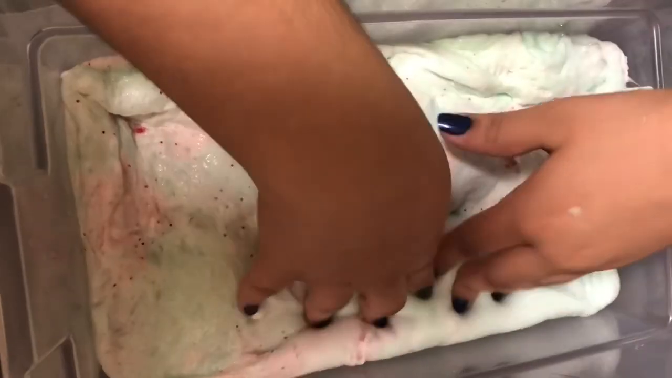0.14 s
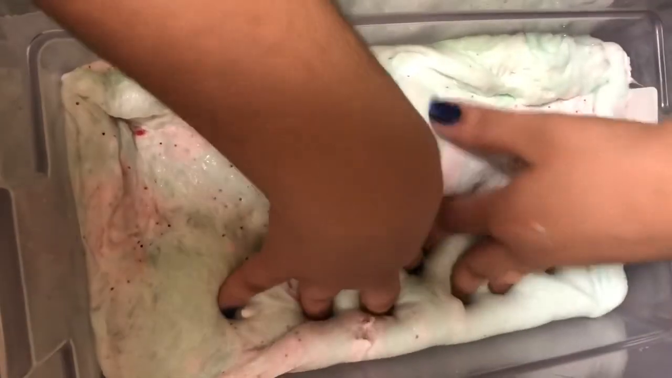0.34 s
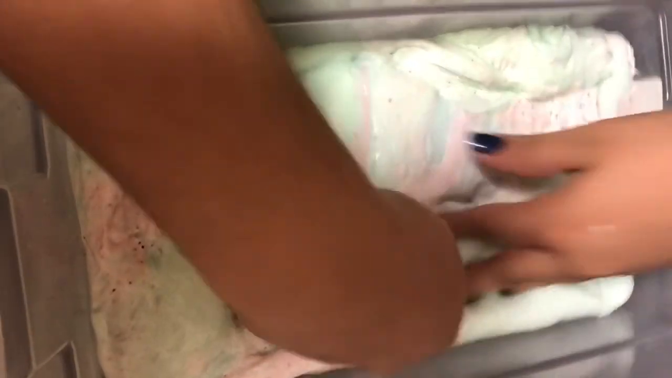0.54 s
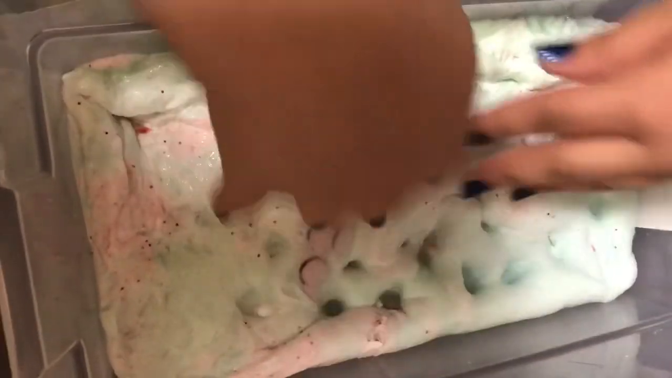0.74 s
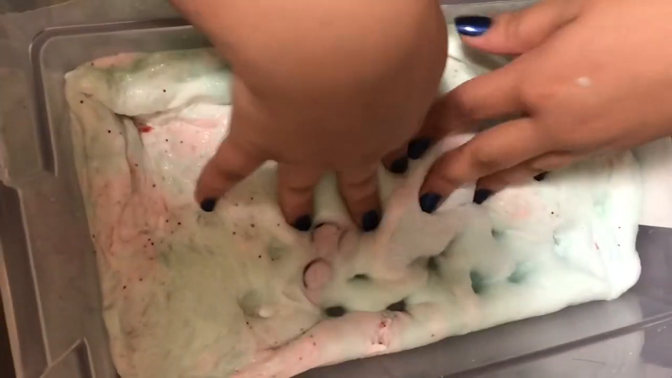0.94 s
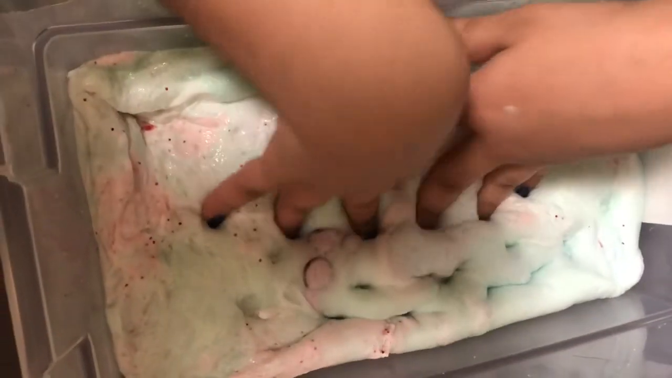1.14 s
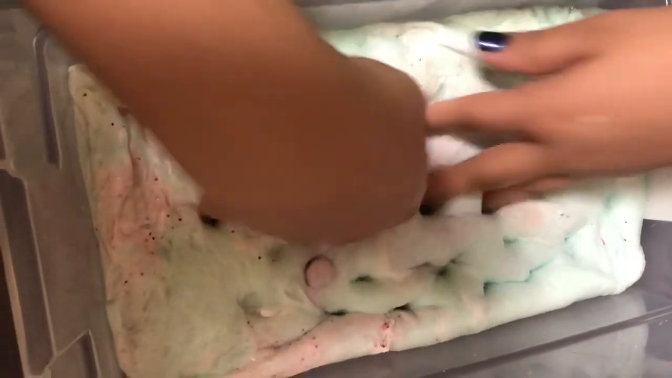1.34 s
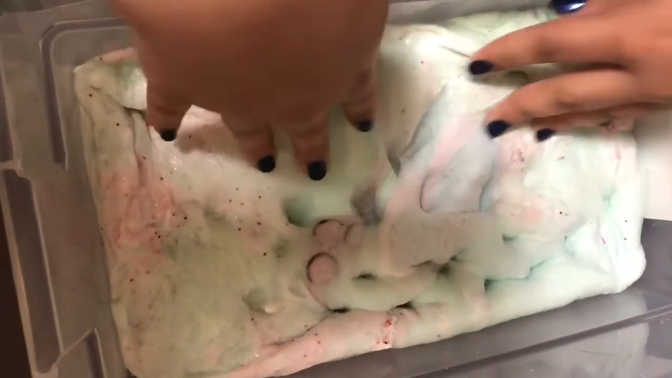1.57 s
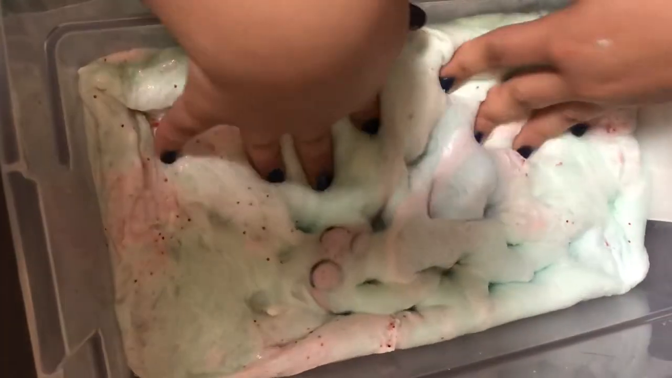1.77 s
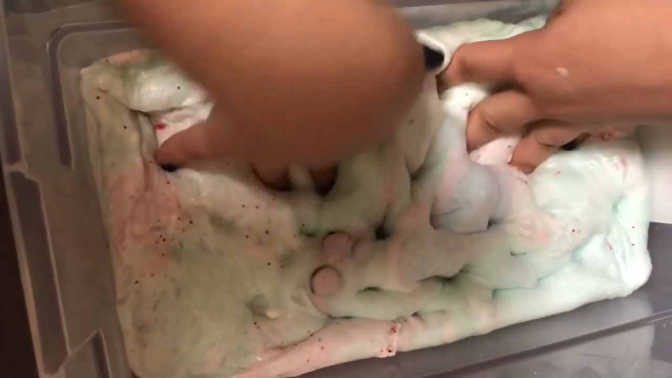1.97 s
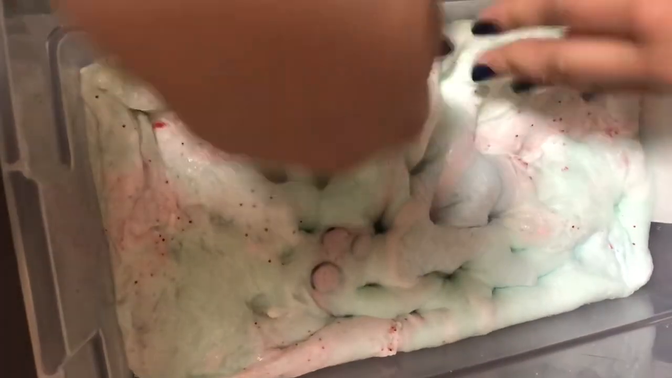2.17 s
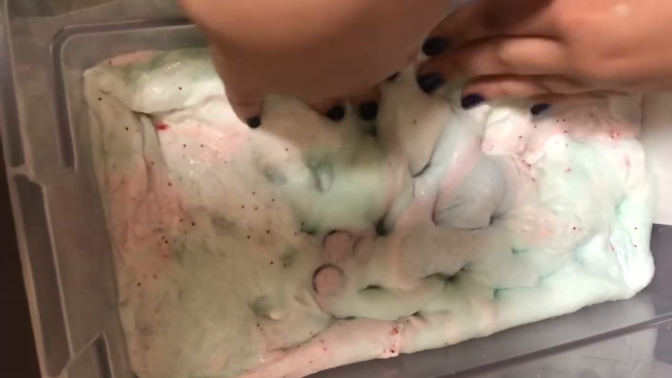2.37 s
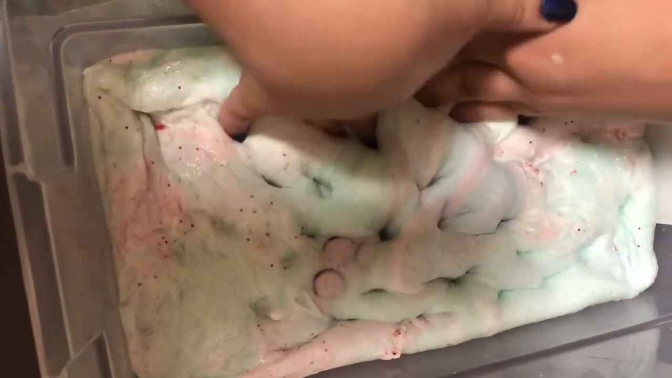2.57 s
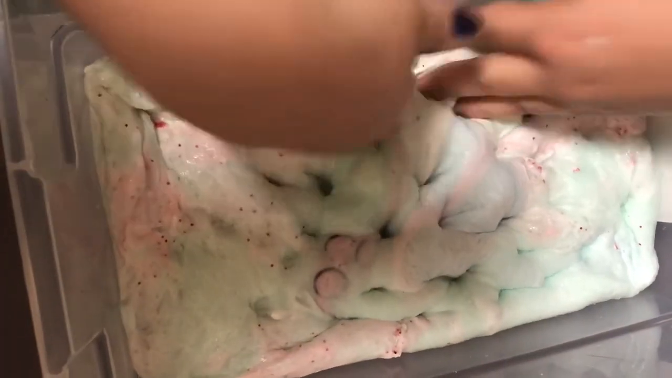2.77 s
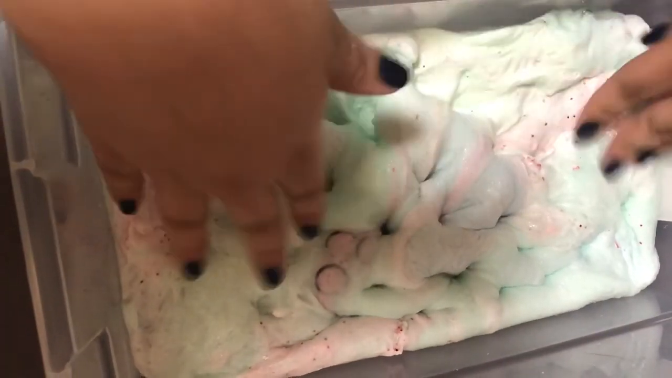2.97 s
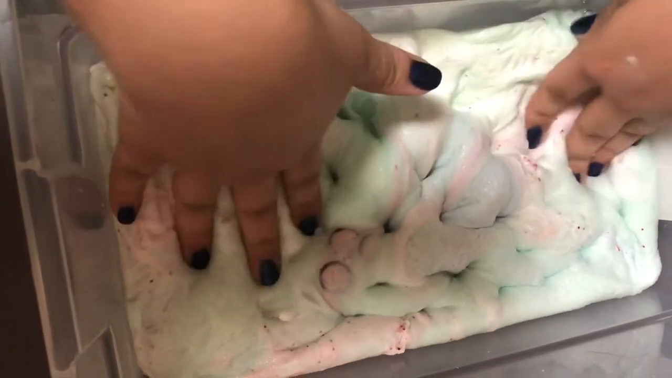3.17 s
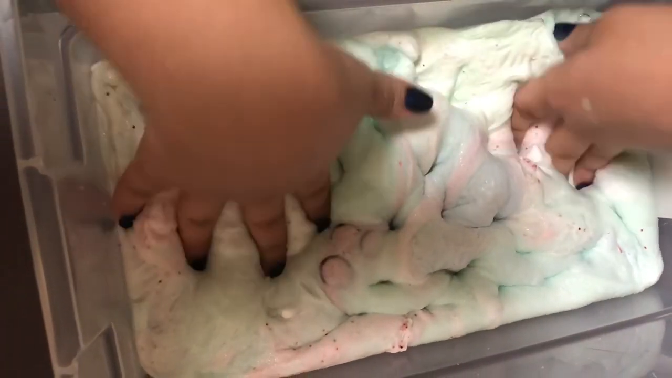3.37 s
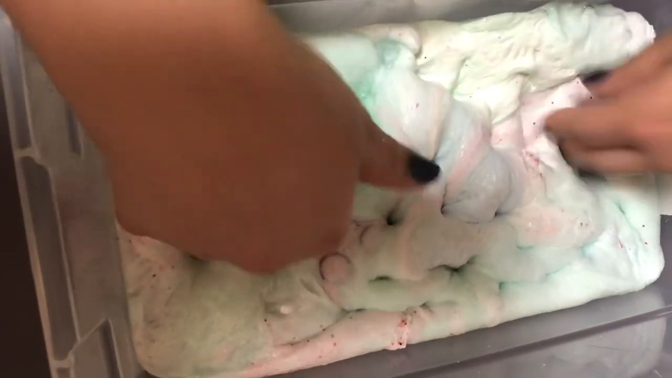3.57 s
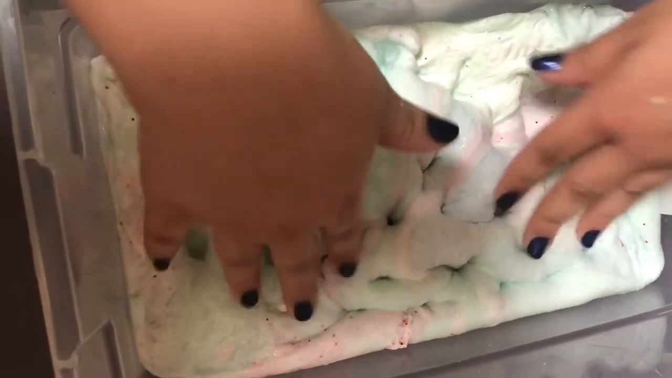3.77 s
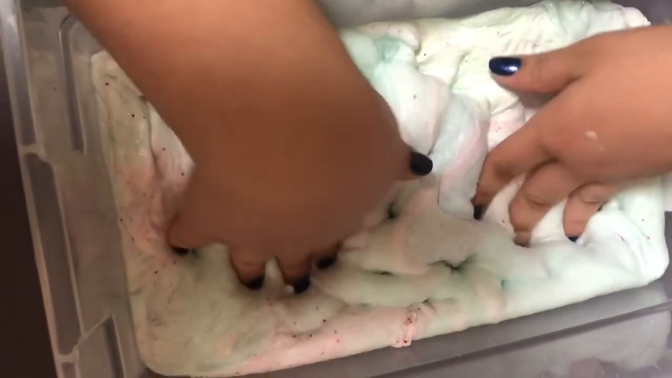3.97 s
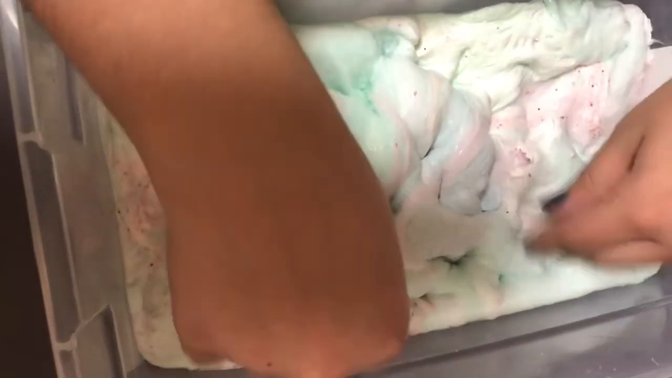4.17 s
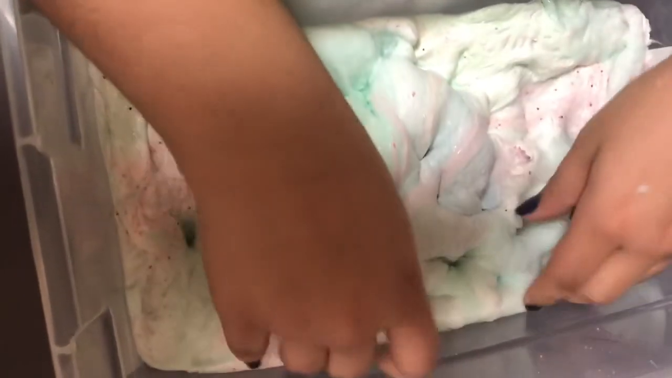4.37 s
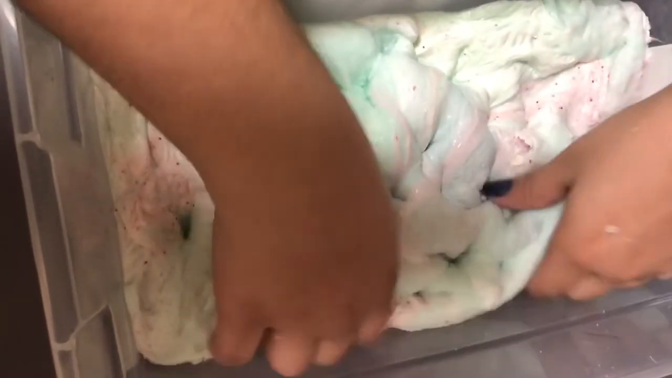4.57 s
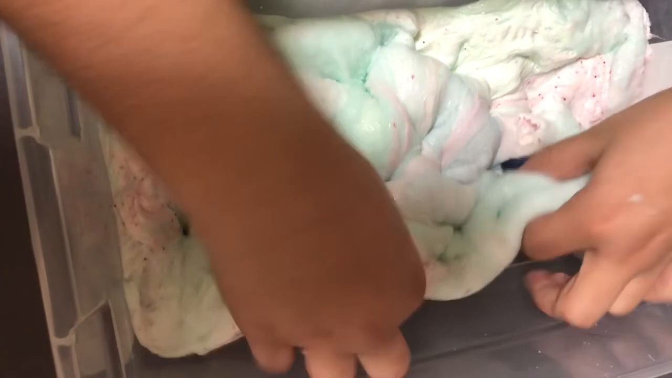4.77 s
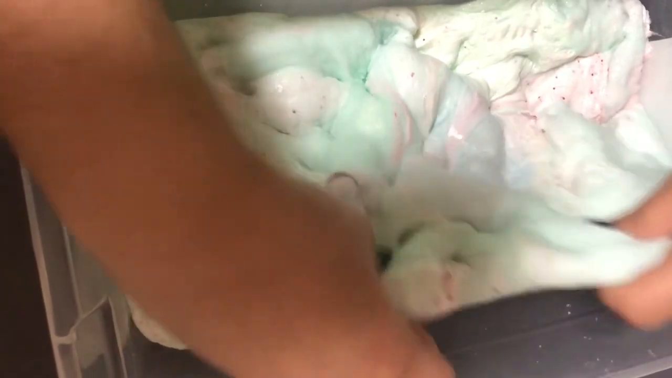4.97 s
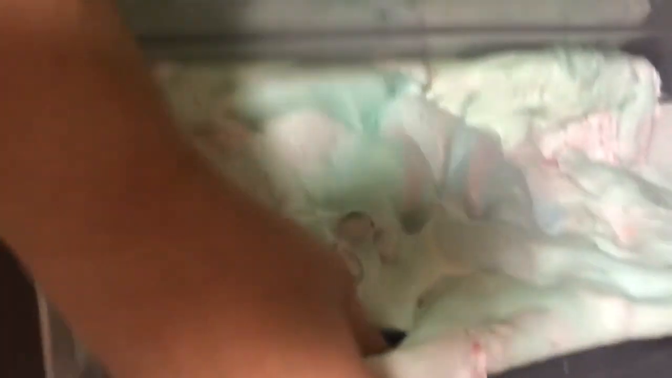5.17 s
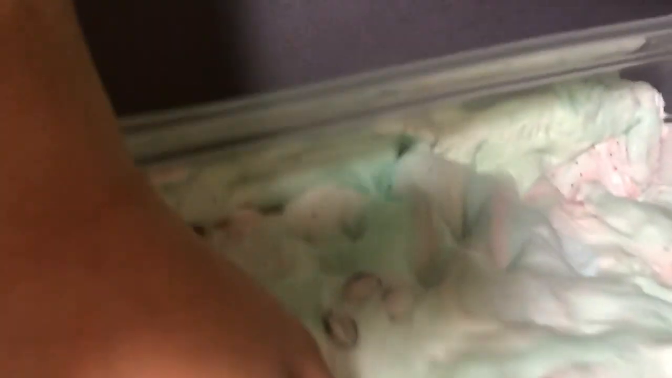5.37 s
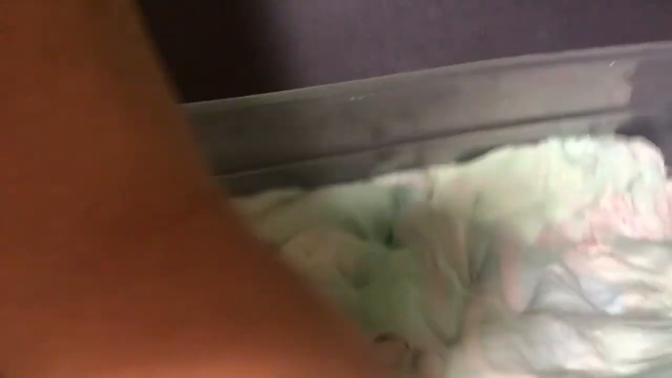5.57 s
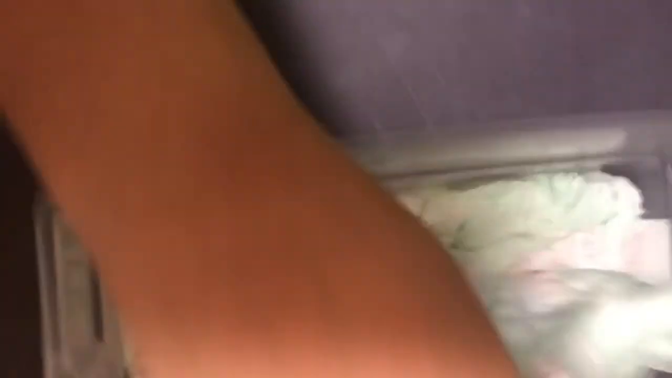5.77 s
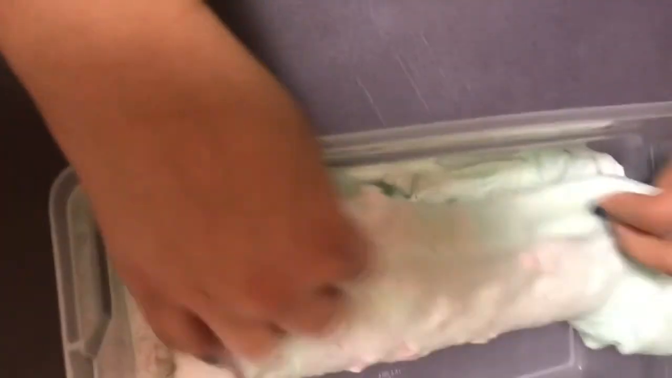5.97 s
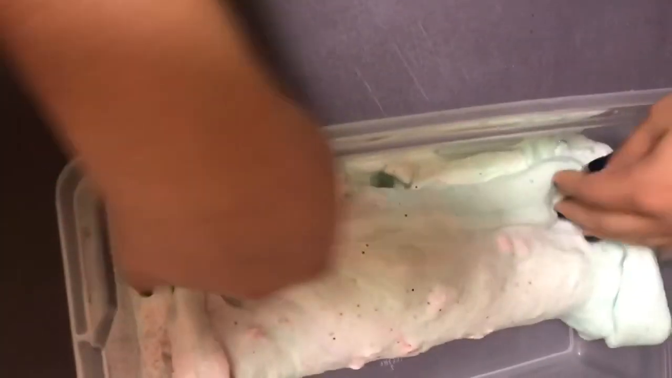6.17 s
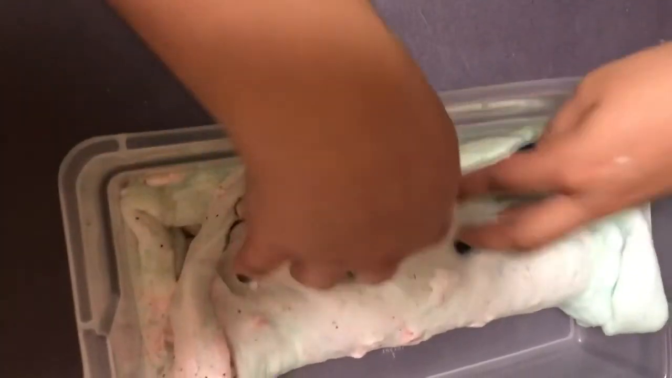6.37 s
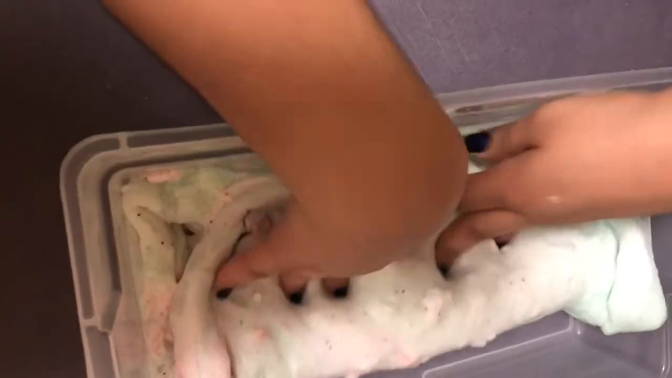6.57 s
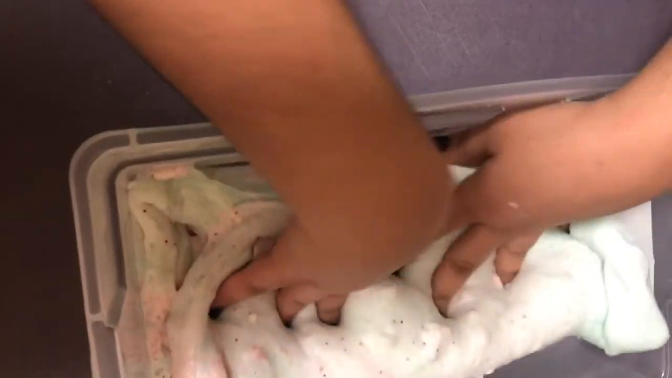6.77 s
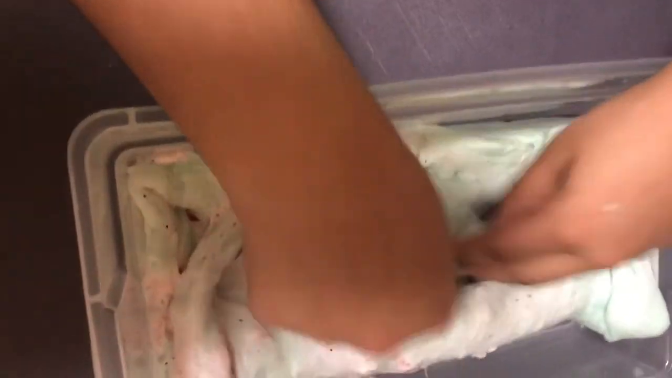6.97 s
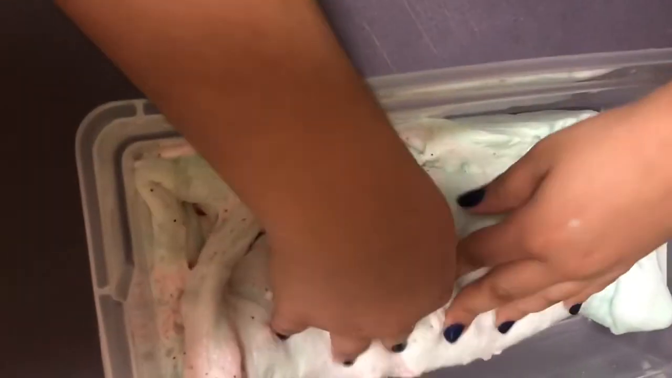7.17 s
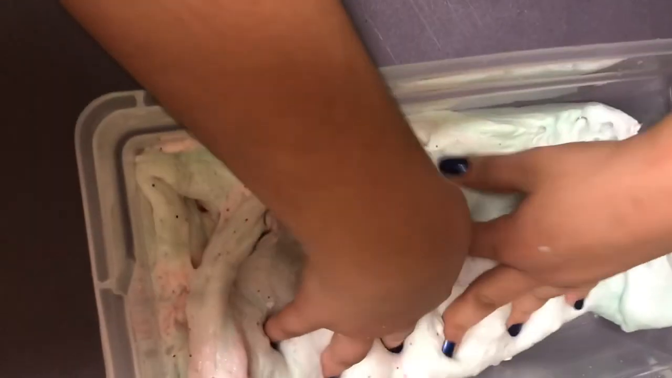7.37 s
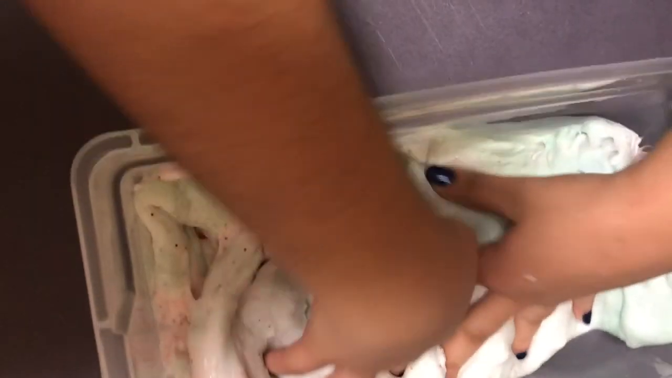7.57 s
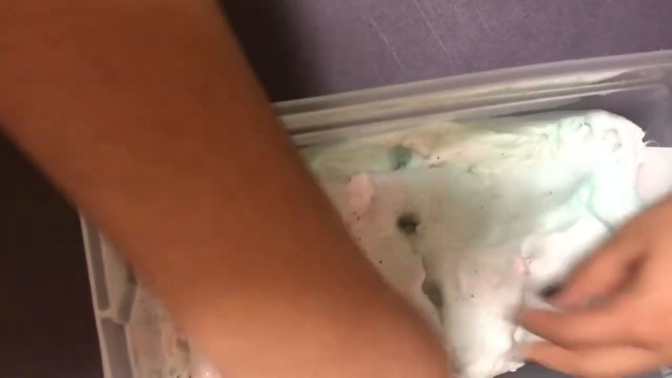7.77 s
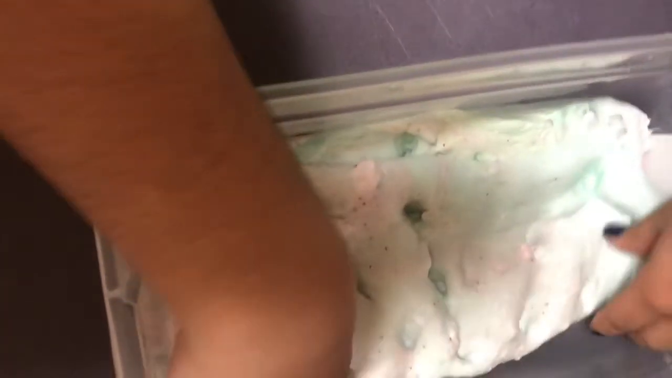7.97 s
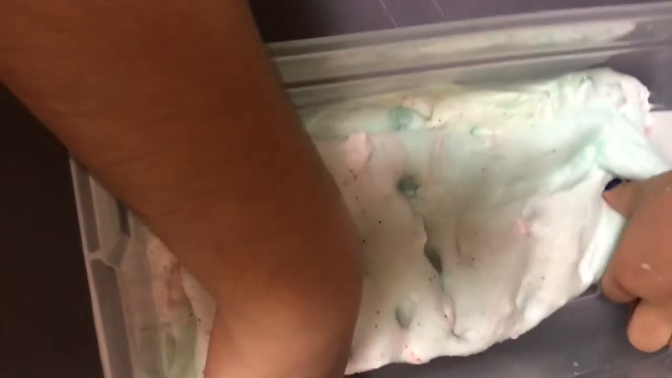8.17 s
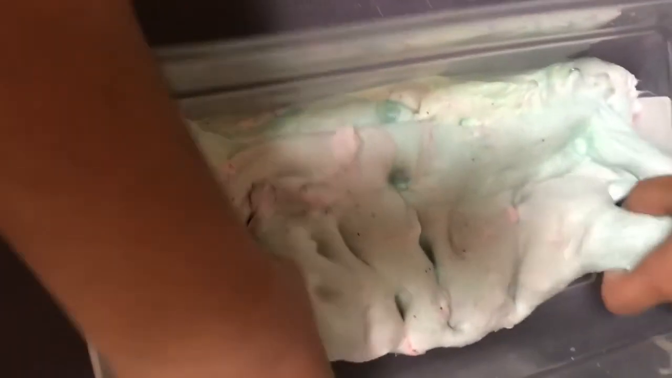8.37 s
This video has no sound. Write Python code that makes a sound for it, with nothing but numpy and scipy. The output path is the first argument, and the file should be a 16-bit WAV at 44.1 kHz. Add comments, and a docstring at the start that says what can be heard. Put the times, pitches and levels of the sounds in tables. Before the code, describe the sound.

Hands knead foamy slime in a plastic bin, fizzing, snapping and gulping close up, with one hard bin knock over quiet fan hum.

```python
"""Over a steady fan hum in a quiet room, hands knead foamy slime in a plastic bin close to a microphone.
From the start shaped noise fizzes as foam is squeezed and peeled, and drags along walls through a moving resonance;
air pockets snap as noise bursts and gulp as sinking sines, in clusters near 0.8, 4.5 and 8.2 s.
Presses thump the modes of the bin; near 6 s the tilted bin drops back onto the floor and rocks,
and the kneading goes on to the last snaps and thump."""
import sys
import numpy as np
from scipy import signal
from scipy.io import wavfile

SR = 44100
rng = np.random.default_rng(int(sys.argv[2]) if len(sys.argv) > 2 else 0)


def store_pcm(level_fs):
    """Save levels as 16-bit WAV."""
    pcm = np.round(np.clip(level_fs, -1, 1) * 32767).astype(np.int16)
    wavfile.write(sys.argv[1], SR, np.atleast_2d(pcm).T)


def gain_from_db(level_db):
    """Convert decibel levels to linear amplitude factors (20 dB per decade)."""
    decades = np.asarray(level_db, float) / 20
    return 10 ** decades


N = 372204

# spectrum of bursting foam, for fine fizz and for snaps: (frequency [Hz], relative level [dB])
FOAM_SPECTRUM = [(400, -39), (2500, 2.5), (4500, 5), (9000, 2.5), (15000, 0)]


def evened(x):
    """Normalization: scales a signal to rms 1."""
    return x / np.sqrt(np.mean(x ** 2) + 1e-20)


def colour(x, points):
    """Minimum-phase filtering: the log gain of a (Hz, dB) table fixes the phase of a causal response."""
    hz, db = np.transpose(points)
    bins = abs(np.fft.fftfreq(4096, 1 / SR)) + 1
    log_gain = np.log(gain_from_db(np.interp(np.log(bins), np.log(hz), db)))
    response = np.exp(np.conj(signal.hilbert(log_gain)))
    taps = np.fft.ifft(response).real[:2048]
    return signal.oaconvolve(x, taps)[:len(x)]


def add(mix, s, sound):
    """Superposition: adds a sound to the mix from time s [s]."""
    part = mix[round(s * SR):][:len(sound)]
    part += sound[:len(part)]


def ring(hz, t60):
    """Damped oscillation: a sine that falls by 60 dB in t60 [s]."""
    t = np.arange(int(t60 * SR)) / SR
    return gain_from_db(-60 * t / t60) * np.sin(2 * np.pi * hz * t)


def grains(per_s, spread_db, length_s):
    """Shot noise: random moments start noise bursts of uneven size that decay exponentially."""
    starts = rng.random(N) < per_s / SR
    size = gain_from_db(spread_db * np.minimum(rng.exponential(1, N), 4)) * starts
    decay = np.exp(-np.arange(400) / SR / length_s)
    return rng.standard_normal(N) * signal.oaconvolve(size, decay)[:N]


def hum():
    """Broadband fan noise and narrow-band tones: noise through a damped resonator wavers within its bandwidth."""
    # spectrum of the air noise: (frequency [Hz], relative level per Hz [dB])
    air_spectrum = [(21, -27.5), (55, -9.5), (90, -14), (154, -15), (193, -6), (384, -9), (536, -19),
                    (915, -19), (1210, -24), (1500, -22.5), (1900, -31), (15500, -65.5)]
    # narrow fan tones: (frequency [Hz], bandwidth [Hz], rms level [dB])
    fan_tones = [(165.2, 7, -55.5), (1562.5, 10, -67.5)]
    out = gain_from_db(-50.5) * evened(colour(rng.standard_normal(N), air_spectrum))
    for hz, width, db in fan_tones:
        resonator = ring(hz, 2.2 / width)  # the bandwidth fixes the decay time
        tone = signal.oaconvolve(rng.standard_normal(N), resonator)[:N]
        out += gain_from_db(db) * evened(tone)
    return out


def room(x):
    """Diffuse reverberation: dense reflections after 4 ms, each band decaying at its own rate."""
    # reverberation time of the room: (frequency [Hz], t60 [s])
    decay_times = [(100, 0.26), (500, 0.35), (1000, 0.43), (3000, 0.38), (14000, 0.23)]
    reflections = rng.standard_normal(SR) * (np.arange(SR) > 0.004 * SR)
    hz, t, z = signal.stft(reflections, SR, nperseg=256)
    table_hz, table_t60 = np.transpose(decay_times)
    t60 = np.interp(hz, table_hz, table_t60)[:, None]
    tail = signal.istft(z * gain_from_db(-60 * t / t60), SR, nperseg=256)[1]
    return signal.oaconvolve(x, tail / np.linalg.norm(tail))[:N]


def bin_body():
    """Modal radiation: a blow starts a dispersed crack and the damped modes of the plastic bin."""
    # modes of the bin: (frequency [Hz], relative level [dB], t60 [s])
    modes = [(76, -8, 0.052), (109, -13.5, 0.29), (165, -6.5, 0.038), (244, -10, 0.036), (348, 2.5, 0.027),
             (529, -2, 0.042), (978, 9, 0.0092), (1900, 7, 0.0034), (2680, -5.5, .012)]
    # dense high modes of the plastic: (frequency [Hz], relative level [dB])
    crack_spectrum = [(300, -45.5), (2000, 0), (4500, 0), (9000, 2), (15000, 4)]
    body, t = np.zeros(SR), np.arange(91) / SR
    # bending waves carry the treble fastest: the crack is a quick downward sweep
    sweep = signal.chirp(t[:90], 17000, t[90], 600) * signal.windows.tukey(90, 0.3)
    add(body, 0, gain_from_db(6.0) * colour(sweep, crack_spectrum))
    for k, (hz, db, t60) in enumerate(modes):
        sign = (-1) ** k  # neighbouring modes swing in opposite sense
        add(body, 0, sign * gain_from_db(db) * ring(hz, t60))
    # a small box radiates no deep bass
    return signal.sosfilt(signal.butter(2, 55, "high", fs=SR, output="sos"), body)


def bin_blows():
    """Impact excitation: a push and short rattle drive the bin; only short contacts reach its high modes."""
    # presses on the bin, and its drop and rocking near 6 s: (time [s], relative strength [dB], contact time [s])
    blows = [(0.027, -18.5, 0.0047), (0.815, -13, 0.0094), (1.317, -34, 0.0049), (2.54, -29, 0.0015),
             (3.069, -23, 0.012), (3.601, -32.5, 0.0027), (4.971, -22, 0.0025), (6.0359, -6, 0.000072),
             (6.0501, -6, 0.0014), (6.0573, -9.5, 0.0013), (6.062, -8.5, 0.0012), (6.082, -14, 0.0019),
             (6.291, -25.5, 0.0041), (8.42, -17, 0.0057)]
    push, t = np.zeros(N), np.arange(3000) / SR
    for s, db, contact in blows:
        noise = rng.standard_normal(len(t))
        rattle = (t == 0) + 0.014 * noise * np.exp(-t / 0.0022)
        window = signal.windows.hann(int(contact * SR) + 3)
        add(push, s, gain_from_db(db) * np.convolve(rattle, window / window.sum()))
    return gain_from_db(-3.0) * signal.oaconvolve(push, bin_body())[:N]


def drag():
    """Moving resonance: frictional noise of the wet mass excites a fold that widens, so its pitch sinks."""
    # wet drag and splash: (frequency [Hz], relative level [dB])
    rub_spectrum = [(150, -6.5), (500, -8), (1200, -10), (2800, -13), (8000, -25.5)]
    # strokes along fingers and walls: (middle time [s], level before the fold [dB], length [s],
    # mid-stroke frequency of the hollow fold [Hz])
    strokes = [(0.0, -37.5, 0.09, 790), (0.763, -50.5, 0.11, 790), (2.224, -62.5, 0.45, 1410),
               (3.517, -49, 0.038, 1300), (3.614, -45.5, 0.095, 740), (4.14, -58, 0.22, 1500),
               (4.903, -55, 0.55, 1320), (5.444, -56.5, 0.64, 1570), (5.834, -50.5, 0.28, 1180),
               (6.993, -53, 0.21, 1180), (7.624, -46, 0.16, 654), (7.763, -50, 0.14, 1300),
               (7.87, -50.5, 0.094, 1000)]
    sink_octaves, lean = 0.95, 0.87  # lean below 1: quick start, slow end
    fold_width, fold_db = 0.4, 7  # bandwidth as a share of the mid-stroke frequency; gain [dB]
    out, t = np.zeros(N), np.arange(N) / SR
    rub = evened(colour(grains(per_s=2000, spread_db=2.5, length_s=0.003), rub_spectrum))
    for s, db, length, hz in strokes:
        on = abs(t - s) < length / 2
        u = (t[on] - s) / length + 0.5  # progress of the stroke, 0 to 1
        stroke = gain_from_db(db) * np.sin(np.pi * u ** lean) * rub[on]
        # shift the fold frequency to zero, low-pass there, and shift back
        fold_hz = hz * 2 ** (sink_octaves * (0.5 - u))
        turn = np.exp(2j * np.pi * np.cumsum(fold_hz) / SR)
        r = np.exp(-np.pi * fold_width * hz / SR)
        smoothed = signal.lfilter([1 - r], [1, -r], stroke / turn)
        fold = 2 * (turn * smoothed).real
        out[on] += stroke + gain_from_db(fold_db) * fold
    return out


def foam(t):
    """Amplitude envelope: each squeeze builds up and ebbs; the pull swells quickly, then all decays to rest."""
    # one row per swell of fizz; a long lift takes several rows: (time when squeezed fullest [s],
    # fizz level [dB], build-up [dB/s], delay until the fingers are free [s], fizz level of the pull [dB])
    swells = [(0.0, -60, 57, 0.01, -57), (0.545, -54.5, 49, 0.22, -48.5), (1.301, -54.5, 72, 0.26, -48),
              (2.05, -54, 70, 0.23, -50), (2.715, -56, 68, 0.31, -51.5), (3.4, -55.5, 78, 0.36, -48.5),
              (4.05, -56.5, 254, 0.28, -50), (4.63, -54, 64, 0.352, -46.5), (5.1, -52.5, 29, 0.16, -49.5),
              (5.45, -53.5, 26, .44, -58.5), (6.02, -62, 38, 0.43, -58), (6.799, -52, 97, 0.35, -47),
              (7.598, -52.5, 62, 0.32, -49.5), (8.2, -58.5, 148, 0.15, -49)]
    ebb, pull_rise, stop = 26.5, 169, 282  # foam tires, swells as fingers peel off, rests [dB/s]
    peel_s = 0.0047  # the pull is at full level this long before the fingers are free
    level = 0
    for full, full_db, build_db, until_free, pull_db in swells:
        free = full + until_free
        rest = gain_from_db(-stop * np.maximum(t - free, 0))
        squeeze = gain_from_db(full_db - build_db * np.maximum(full - t, 0) - ebb * np.maximum(t - full, 0))
        pull = gain_from_db(pull_db - pull_rise * np.maximum(free - peel_s - t, 0))
        level = np.maximum(level, rest * np.maximum(squeeze, pull))
    return level


def fizz():
    """Granular noise: many tiny bubbles burst under the fingers as the foam is squeezed and pulled."""
    bursts = grains(per_s=1000, spread_db=2.8, length_s=0.0012)
    return foam(np.arange(N) / SR) * evened(colour(bursts, FOAM_SPECTRUM))


def pops():
    """Transient and cavity sound: the skin tears with a bright snap; the pocket gulps, sinks in pitch, splashes."""
    # air pockets that burst and gulp: (time [s], relative snap level [dB], gulp level [dB],
    # mid-gulp frequency [Hz])
    pockets = [(0.0054, -33.5, -34, 590), (0.0235, -32, -29.5, 366), (0.546, -27.5, -38, 700),
               (0.757, -49, -37, 350), (0.791, -37, -27, 710), (0.798, -58, -29, 440),
               (0.8035, -44, -28, 785), (0.808, -57, -28, 400), (1.3093, -39, -39.5, 410),
               (1.596, -44, -33, 744), (1.609, -40.5, -31.5, 412), (2.2642, -34, -36.5, 560),
               (2.309, -40, -36.5, 786), (2.341, -68, -41, 400), (2.786, -57, -39, 1100),
               (2.813, -51.5, -44, 980), (2.978, -42, -39, 695), (3.0226, -33, -27, 1420),
               (3.0265, -55, -26.5, 735), (3.749, -42, -39, 406), (3.7751, -34, -30.5, 2150),
               (4.341, -36.5, -37, 920), (4.4638, -60, -34, 400), (4.4758, -38, -21, 615),
               (4.481, -55, -23.5, 260), (4.4852, -38, -23.5, 1350), (4.4967, -42.5, -27.5, 280),
               (4.5122, -42, -30, 267), (4.5566, -54, -33, 525), (4.6, -48.5, -33.5, 2260),
               (4.7037, -53, -37.5, 910), (4.77, -45, -34.5, 1420), (4.8523, -45, -43, 885),
               (4.863, -41.5, -29, 890), (4.869, -55, -36, 428), (4.9407, -47, -33.5, 1120),
               (5.0305, -51, -23, 710), (6.288, -39, -24, 1100), (6.29, -53, -23, 361),
               (7.081, -67, -39, 367), (7.161, -58, -35, 895), (7.861, -48, -47, 1160),
               (7.884, -52, -40, 1260), (7.928, -47, -34, 840), (7.9525, -55, -35, 1060),
               (8.1443, -64, -32, 1120), (8.1987, -50, -35.5, 1010), (8.236, -54, -37, 1900),
               (8.254, -64, -32, 710), (8.27, -65, -28, 1010), (8.3942, -40.5, -29.5, 1130),
               (8.4138, -34, -24, 1210)]
    # thin threads and blisters that only tick: (time [s], relative level [dB])
    ticks = [(0.423, -46), (0.521, -44), (1.5592, -41.5), (2.0048, -44.5), (2.0415, -41.5), (2.582, -50.5),
             (2.695, -40.5), (2.717, -42), (2.9958, -41.5), (3.395, -39), (3.41, -43.5), (3.4353, -41),
             (3.484, -44.5), (3.532, -40), (4.045, -49), (4.061, -46.5), (4.139, -47), (4.152, -45),
             (4.366, -50), (4.538, -39), (4.618, -49), (4.652, -44.5), (4.835, -46), (4.884, -45),
             (5.105, -45), (5.258, -47), (5.2918, -36), (5.5753, -47), (6.0132, -47), (6.767, -46),
             (7.841, -43), (8.298, -38)]
    # wet splash inside the pocket: (frequency [Hz], relative level [dB])
    splash_spectrum = [(110, -42), (330, 3.5), (1500, -5), (6000, -28.5)]
    cycles, sink_octaves, lean = 4.05, 1.05, 1  # length in mid-gulp periods; lean 1: even swell and shut
    snaps, gulps, splash, t = np.zeros(N), np.zeros(N), np.zeros(N), np.arange(1200) / SR
    snap = (np.exp(-t / 0.00058) + 0.25 * np.exp(-t / 0.0044)) * np.minimum(t / 0.0004, 1)
    splash_shape = np.exp(-t / 0.0051) * np.minimum(t / 0.0019, 1)
    for s, db in ticks:
        add(snaps, s, gain_from_db(db) * rng.standard_normal(len(t)) * snap)
    for s, snap_db, gulp_db, hz in pockets:
        snap_noise, splash_noise = rng.standard_normal((2, len(t)))
        add(snaps, s, gain_from_db(snap_db) * snap_noise * snap)
        u = np.arange(0, 1, hz / cycles / SR)  # progress of the gulp, 0 to 1
        turns = np.cumsum(hz * 2 ** (sink_octaves * (0.5 - u))) / SR
        add(gulps, s, gain_from_db(gulp_db) * np.sin(np.pi * u ** lean) * np.sin(2 * np.pi * turns))
        add(splash, s, gain_from_db(gulp_db) * splash_noise * splash_shape)
    return gain_from_db(8.5) * colour(snaps, FOAM_SPECTRUM) + gulps + gain_from_db(10.0) * colour(splash, splash_spectrum)


def scene():
    """Superposition of direct and reverberant sound: slime and bin with their reflections, over the hum."""
    slime = pops() + fizz() + drag()
    box = bin_blows()
    reflections = room(gain_from_db(-11.5) * slime + gain_from_db(-5.0) * box)
    return (slime + box + reflections + hum())[None]


def band_limit(x):
    """A steep low-pass at the top of the band."""
    return signal.sosfilt(signal.butter(12, 17030, fs=SR, output="sos"), x)


def record(dry):
    """Band limiting and soft saturation: deep bass is filtered out, a band edge near 15.8 kHz dulls
    the top treble, and peaks are rounded."""
    no_bass = signal.sosfilt(signal.butter(3, 45, "high", fs=SR, output="sos"), dry)
    band_edge = signal.firwin(255, 15800, fs=SR)
    dull = signal.oaconvolve(no_bass, band_edge[None], "same")
    top_treble = no_bass - dull
    soft = np.tanh(dull + gain_from_db(-25.0) * top_treble)
    return band_limit(soft)


dry = scene()
out = record(dry)
store_pcm(out)
```